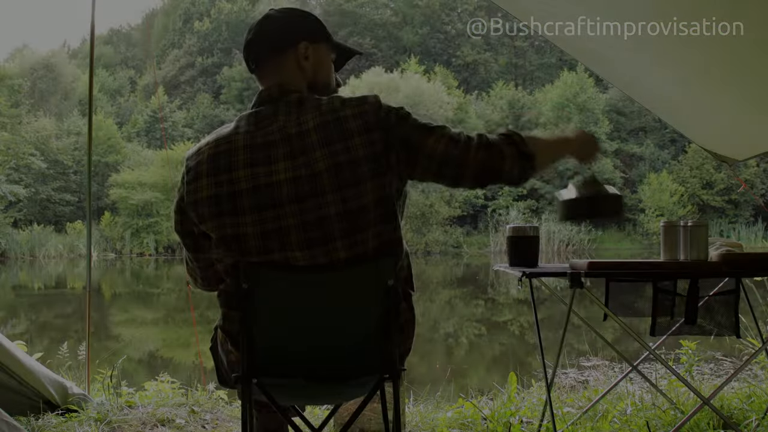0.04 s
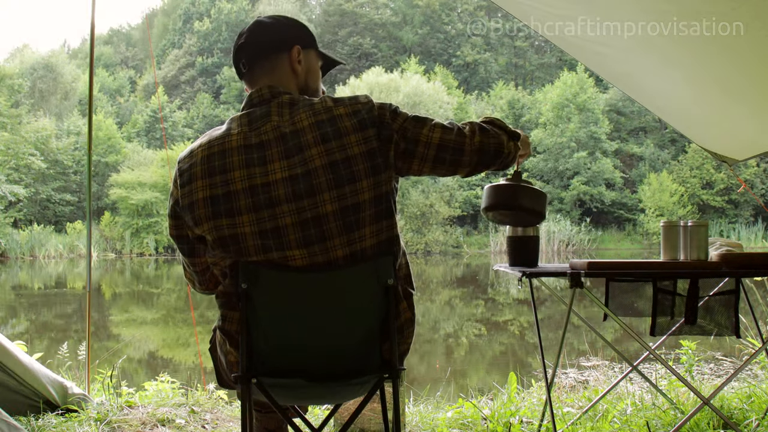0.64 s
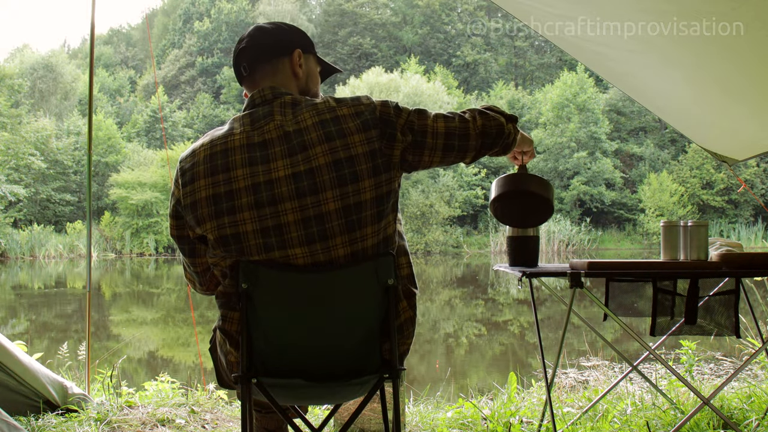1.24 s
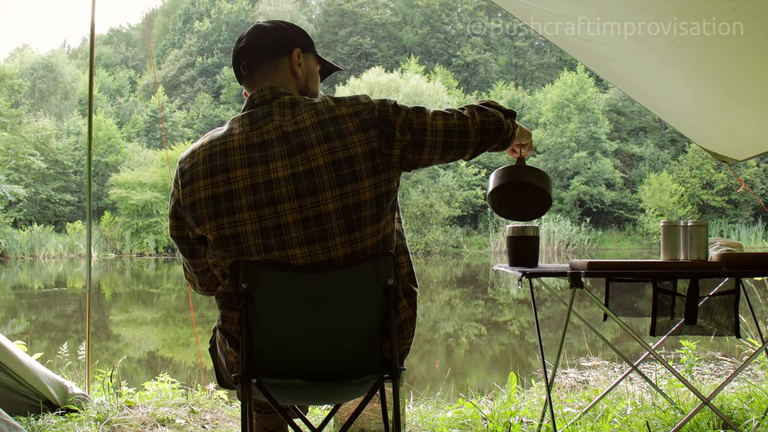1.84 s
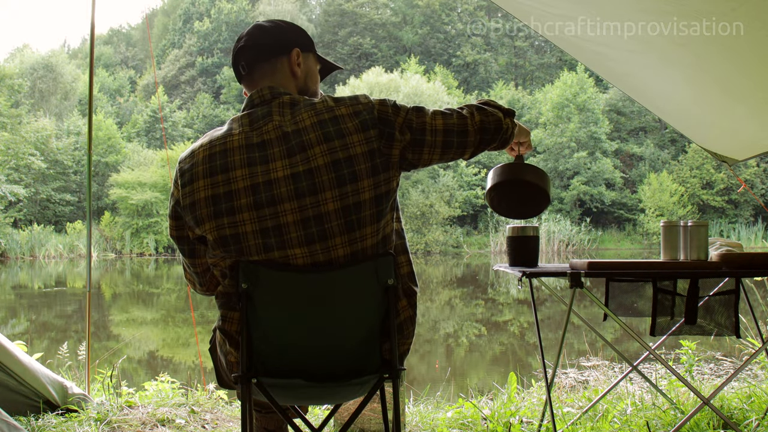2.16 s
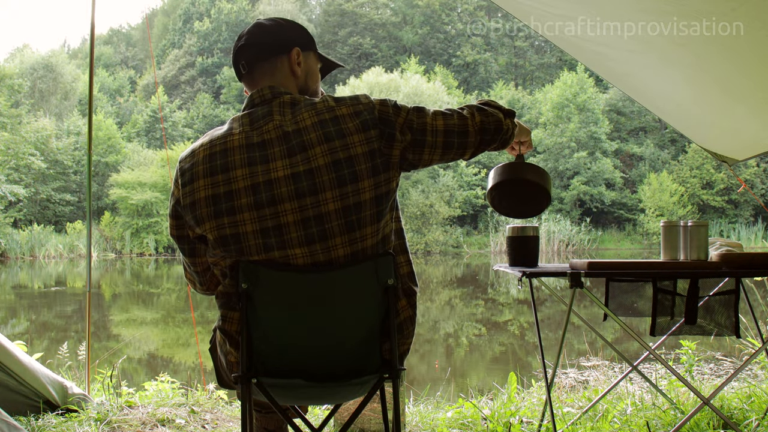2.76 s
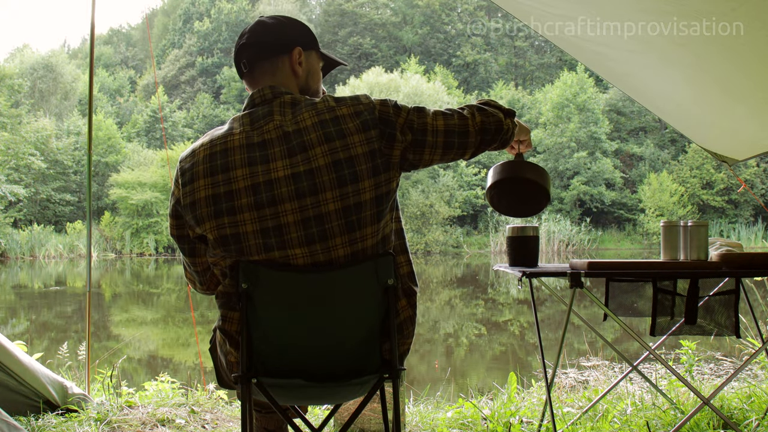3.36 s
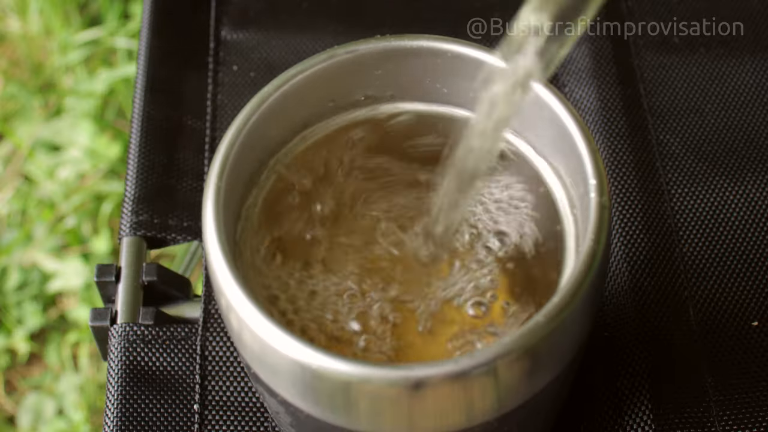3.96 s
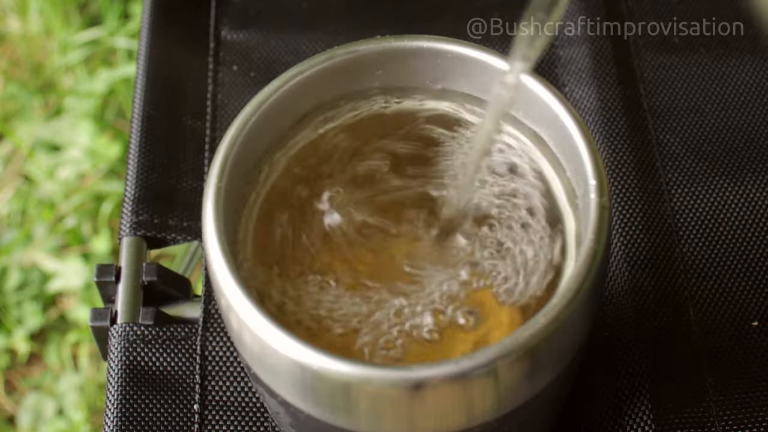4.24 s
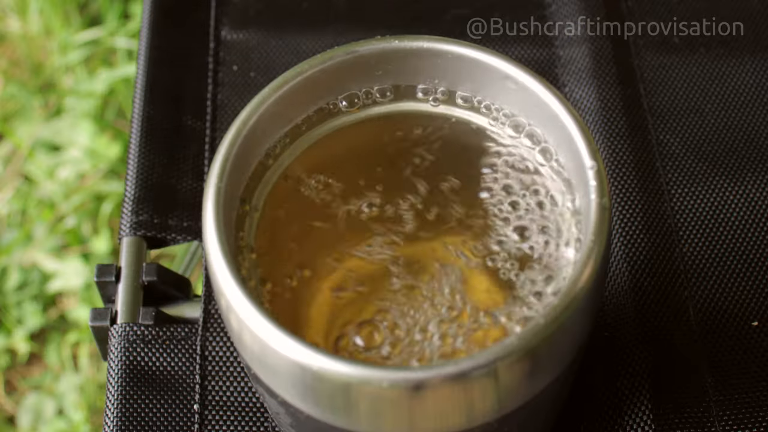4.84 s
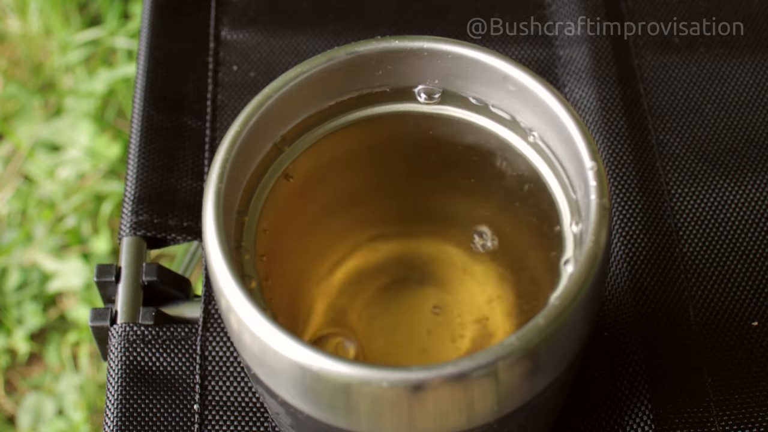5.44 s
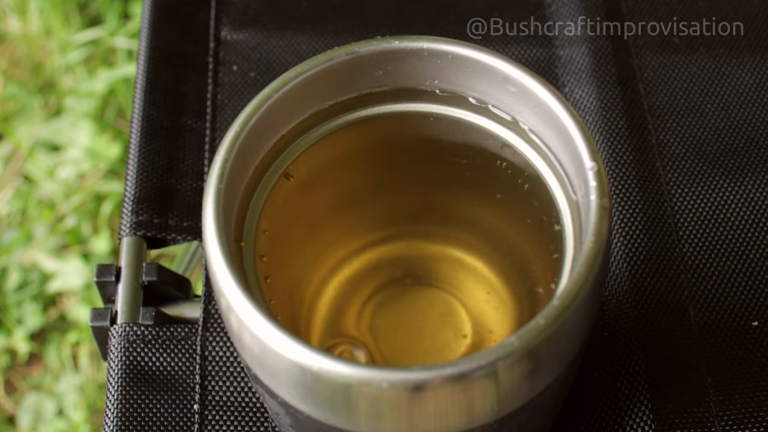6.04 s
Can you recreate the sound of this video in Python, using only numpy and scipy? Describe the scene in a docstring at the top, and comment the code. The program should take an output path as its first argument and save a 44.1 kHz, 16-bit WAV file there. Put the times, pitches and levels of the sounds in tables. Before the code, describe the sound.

Tea trickles from a kettle into a steel mug outdoors, first a few steps away, then close and splashy, ending in fizzing foam.

```python
"""Tea poured by a pond

A kettle fills a steel mug on a camp table, the microphone first a few steps off, then close to the mug.
The stream traps bubbles that ring and rise in pitch, drops splat, and the mug's low tone climbs as it
fills. When the pour stops, the table takes a few knocks and the foam fizzes out. Behind it all,
insects and thin, distant bird whistles sound over the outdoor air."""
import sys
import numpy as np
from scipy import signal
from scipy.io import wavfile

SR = 44100
rng = np.random.default_rng(int(sys.argv[2]) if len(sys.argv) > 2 else 0)


def put_to_file(sound):
    """Save the sound as 16-bit audio at rate SR, in the file named by the first command-line argument."""
    columns = np.atleast_2d(sound).T  # one column per channel
    safe = np.clip(columns, -1, 1)
    whole_steps = np.round(safe * 32767)
    wavfile.write(sys.argv[1], SR, whole_steps.astype(np.int16))


N = 268524
TIME = np.arange(N) / SR

# open air by the pond: (frequency [Hz], relative level [dB])
AIR_SPECTRUM = [(24, -57), (40, -20.5), (171, 1.5), (382, -0.5), (1090, -6.5), (2910, -12.5), (12100, -19),
                (16000, -27.5)]
# birds far off: (start [s], length [s], relative level [dB], first pitch [Hz], last pitch [Hz])
BIRD_WHISTLES = [(0.214, 0.99, -79.5, 7120, 6450), (0.7, 0.9, -80, 5080, 5060),
                 (2.4, 1.1, -83.5, 6950, 6630), (4.792, 0.47, -77, 6850, 6830),
                 (5.803, 0.18, -71, 2930, 5340)]
# insects around the pond: (time [s], level [dB], pitch [Hz])
INSECT_RASPS = [(0.458, -63.5, 11400), (1.044, -57.5, 12600), (1.419, -65, 11300), (1.513, -58.5, 14100),
                (1.757, -54.5, 12100), (2.374, -53.5, 12500), (2.759, -57.5, 11200), (3.441, -56, 13000)]
# the kettle's wire handle shifts: (time [s], relative level [dB])
HANDLE_CLICKS = [(0.256, -58), (0.598, -62)]
# knocks and soft bumps on the table: (time [s], relative level [dB], contact time [ms])
TABLE_KNOCKS = [(4.56, -44.5, 1.14), (4.613, -42, 0.12), (4.934, -45.5, 1.54), (4.973, -48.5, 0.91),
                (5.071, -49.5, 0.91), (5.196, -42, 2.8)]
# the camp table: (frequency [Hz], relative level [dB], t60 before contact damping [s])
TABLE_MODES = [(216.5, -5, 0.22), (460, 6.5, 0.032), (798, -7.5, 0.061), (1347, -7, 0.14),
               (2280, 20.5, 0.0032), (3780, 9, 0.053)]
# foam at close range: (frequency [Hz], gain [dB])
FOAM_SPECTRUM = [(1500, -9), (4000, -4), (5500, -5), (6700, -2), (8000, -3.5), (16000, -4)]
# wall and air of the half-empty mug: (frequency [Hz], width [Hz], relative level [dB])
WALL_MODES = [(1530, 1300, 9), (2470, 490, 11.5), (3486, 180, 18), (4050, 160, 19), (6100, 2200, -4.5)]
# the steel's two tones under the stream: (start [s], frequency [Hz], width [Hz], relative level [dB])
STEEL_TONES = [(1.8, 3455, 110, -62.5), (1.15, 4070, 340, -68.5)]
# the first bubbles, a few steps off: (time [s], relative level [dB], pitch [Hz])
FAR_PLINKS = [(1.523, -43, 4070), (1.536, -43.5, 3420), (1.5504, -45, 7070), (1.5636, -38.5, 2426),
              (1.8487, -38, 3500), (1.9501, -31.5, 1573), (1.974, -43.5, 6370)]
# round plops, a few steps off: (time [s], relative level [dB], gulp pitch [Hz])
FAR_PLOPS = [(1.976, -39.5, 980), (2.104, -37.5, 1070), (2.394, -36, 910), (2.437, -40, 1130),
             (2.445, -29.5, 920), (2.478, -38.5, 1100), (2.498, -36, 905), (2.526, -36, 682),
             (2.586, -45, 880), (2.623, -42, 900), (2.66, -37.5, 950), (2.673, -37, 723),
             (2.712, -35, 1106), (2.728, -42, 860), (2.762, -38, 790), (2.801, -39.5, 702),
             (3.001, -43, 1080), (3.108, -37.5, 720), (3.324, -43, 704)]
# drops on the steel wall, a few steps off: (time [s], relative level [dB])
WALL_DROPS = [(1.7028, -51.5), (1.9508, -38), (2.0287, -35), (2.219, -42.5), (2.248, -40.5), (2.398, -33.5),
              (2.436, -36), (2.475, -41.5), (2.5863, -35.5), (2.6664, -32.5), (3.326, -51), (3.3682, -38)]
# the largest bubbles, close: (time [s], relative level [dB], pitch [Hz], climb [octaves])
CLOSE_BUBBLES = [(3.649, -20, 3270, 0.18), (3.6725, -20, 1380, 0), (3.679, -24, 3060, 0.67),
                 (3.700, -18.5, 1860, 0.013), (3.7247, -20, 1800, 0), (3.7709, -22, 1670, 0.23),
                 (3.8154, -17.5, 1760, 0.78), (3.879, -26.5, 3500, 0.22), (3.9497, -15.5, 3480, 0),
                 (3.959, -22, 1800, 0.48), (3.9796, -26.5, 1850, 0.49), (4.017, -25, 1700, 0.42),
                 (4.034, -27, 2700, 0.61), (4.059, -21, 3000, 0.23), (4.1032, -22, 2640, 0.91),
                 (4.1186, -22.5, 2120, 1.0), (4.138, -25.5, 1810, 0.34), (4.1706, -19.5, 3720, 0.15),
                 (4.2536, -15.5, 1950, 0), (4.271, -23, 1640, 0), (4.302, -21, 3380, 0.66),
                 (4.3897, -20.5, 2890, 1.1), (4.4111, -22, 3100, 0.39), (4.455, -16, 3000, 0.27),
                 (4.4697, -22.5, 3320, 0.17), (4.4885, -12.5, 3580, 0.087)]
# drops slapping the tea, close: (time [s], relative crack level [dB], relative air push level [dB])
CLOSE_SPLATS = [(3.6476, -7.5, -27.5), (3.671, -24, -32), (3.7717, -33, -41), (3.796, -30, -57),
                (3.8176, -44, -34), (3.889, -24, -33.5), (3.9125, -10, -34.5), (3.9527, -20, -44),
                (4.0769, -36, -39), (4.1474, -12, -37), (4.153, -10.5, -59), (4.2003, -27, -38),
                (4.2415, -18, -34.5), (4.255, -19.5, -36), (4.36, -19, -42), (4.4132, -9.5, -33),
                (4.431, -22, -34.5), (4.4552, -22.5, -34.5), (4.487, -15, -38.5)]
# the crack of a splat: (frequency [Hz], gain [dB])
CRACK_SPECTRUM = [(300, -27), (1500, 5), (3500, 6), (6000, -1), (9000, 4.5), (15000, 0)]
# the air above the tea, close: (frequency [Hz], width [Hz], relative level [dB])
HOLLOW_MODES = [(757, 36, 5), (1030, 81, 9.5), (1200, 160, 4.5)]

# the pour starts, is heard close, thins as the kettle tips back, ends
POUR_S, CLOSE_S, TAPER_S, STOP_S = 1.45, 3.645, 4.28, 4.5
MUG_AIR_HZ = 949  # air resonance of the half-empty mug


def amp(db):
    """Decibels to gain."""
    return 10 ** (np.asarray(db) / 20)


def unit_rms(x):
    """Scales to rms 1."""
    return x / np.sqrt(np.mean(x ** 2) + 1e-20)


def since(s, t):
    """Seconds gone by since s; zero before it."""
    return np.maximum(t - s, 0)


def close_up():
    """0 while the microphone is a few steps off, 1 once it is close to the mug."""
    return np.clip((TIME - CLOSE_S) / .01 + 1, 0, 1)


def add(mix, s, sound):
    """Mixes a sound in at s seconds."""
    part = mix[max(round(s * SR), 0):][:len(sound)]
    part += sound[:len(part)]


def colour(x, spectrum):
    """Minimum-phase filter with the given spectrum."""
    hz, db = np.transpose(spectrum)
    bins_hz = abs(np.fft.fftfreq(4096, 1 / SR)) + 1
    log_gain = np.log(amp(np.interp(np.log(bins_hz), np.log(hz), db)))
    taps = np.fft.ifft(np.exp(np.conj(signal.hilbert(log_gain)))).real
    return signal.oaconvolve(x, taps[:len(taps) // 2])[:len(x)]


def resonate(x, hz, width_hz, stages=2):
    """Resonances of gain 1 in series, each width_hz wide; hz may be a pitch curve."""
    carrier = np.exp(2j * np.pi * np.cumsum(hz * np.ones(len(x))) / SR)
    pole = np.exp(-np.pi * width_hz / SR)
    for _ in range(stages):
        x = 2 * (carrier * signal.lfilter([1 - pole], [1, -pole], x / carrier + 1e-18)).real
    return x


def ring(x, modes):
    """Passes x through a set of modes whose joint response has unit energy."""
    t = np.arange(SR // 10) / SR
    response = sum(amp(db) * width * np.exp(-np.pi * width * t) * np.cos(2 * np.pi * hz * t)
                   for hz, width, db in modes)
    return signal.oaconvolve(x, response / np.linalg.norm(response))[:len(x)]


def reflections(x, t60, wet_db):
    """Adds the scattered echoes that reach the microphone after the direct sound."""
    t = np.arange(SR) / SR
    taps = rng.choice([-1, 1], len(t)) * (rng.random(len(t)) < 3000 / SR)
    taps = taps * (t > .001) * amp(-60 * t / t60)
    return x + amp(wet_db) * signal.oaconvolve(x, taps / np.linalg.norm(taps))[:N]


def burst(decay_s):
    """A dying puff of noise, of unit energy."""
    t = np.arange(SR // 25) / SR
    puff = rng.standard_normal(len(t)) * np.exp(-t / decay_s)
    return puff / np.linalg.norm(puff)


def patter(per_s, spread_db):
    """Random clicks of uneven size, rms 1."""
    size = amp(spread_db * np.minimum(rng.exponential(1, N), 4)) * rng.choice([-1, 1], N)
    return unit_rms(size * (rng.random(N) < per_s / SR))


def spurts(per_s, depth_db):
    """A gain that wanders at random, as when a falling stream breaks up."""
    knots = rng.standard_normal(N // 100)
    wander = np.interp(TIME * per_s, np.arange(len(knots)), knots)
    return amp(depth_db * np.clip(wander, -2, 2))


def bubble(hz, t60, rise, swell_cycles):
    """A trapped bubble rings up, then sharpens as it nears the surface."""
    t = np.arange(int(t60 * SR * 1.2)) / SR
    envelope = (1 - np.exp(-t * hz / swell_cycles)) * amp(-60 * t / t60)
    return envelope * np.sin(2 * np.pi * hz * t * (1 + rise * t / t60 / 2))


def chirp(hz, octaves, length_s):
    """A bubble that swells and fades, climbing by `octaves` through hz."""
    progress = np.arange(0, length_s, 1 / SR) / length_s
    pitch = hz * 2 ** (octaves * (progress - 1 / 3))
    return np.sin(np.pi * progress ** .47) ** 2 * np.sin(2 * np.pi * np.cumsum(pitch) / SR)


def bubble_cluster(centre_hz):
    """One drop traps six tiny bubbles within a few ms; unit energy."""
    out = np.zeros(SR // 25)
    for k, (tune, wait) in enumerate(rng.uniform(-0.8, 1, (6, 2))):
        plink = bubble(centre_hz * 2 ** (0.5 * tune), t60=0.011, rise=0.042, swell_cycles=0.55)
        add(out, k * 0.00078 * (1 + wait / 2), plink / np.sqrt(k + 1))
    return out / np.linalg.norm(out)


def swarm(start, end, pitch, octaves, cycles, rise, spread_db, count):
    """Many small bubbles scattered about a pitch (Hz, or a function of time); rms 1 while they last."""
    out = np.zeros(N)
    times = start + (end - start) * (np.arange(count) + rng.uniform(-0.965, 1, count)) / count
    for s, (tune, size, life) in zip(times, np.clip(rng.standard_normal((count, 3)), -2, 2)):
        hz = (pitch(s) if callable(pitch) else pitch) * 2 ** (octaves * tune)
        t60 = cycles / hz * np.exp(0.44 * life)
        gain = amp(spread_db * size) * np.sqrt(hz)  # small bubbles are brief but sharp
        add(out, s, gain * bubble(hz, t60, rise, swell_cycles=0.53))
    return unit_rms(out) * np.sqrt((end - start) * SR / N)


def pond_air():
    """An even outdoor wash over a low rumble that swells once and is weaker close to the mug."""
    wash, low = rng.standard_normal((2, N))
    rumble = unit_rms(resonate(low, hz=97, width_hz=124))
    swell = amp(-60) * np.exp(-((TIME - 2.665) / 0.051) ** 2)
    rumble_gain = amp(-70.5 - 9.5 * close_up()) + swell
    return amp(-65) * unit_rms(colour(wash, AIR_SPECTRUM)) + rumble_gain * rumble


def birds():
    """Gliding whistles far from the microphone, blurred by the trees."""
    out = np.zeros(N)
    for s, length, db, first_hz, last_hz in BIRD_WHISTLES:
        blur = rng.standard_normal(2 * SR)[:int(length * SR)]
        hz = first_hz + (last_hz - first_hz) * np.sin(np.linspace(0, np.pi / 2, len(blur)))
        whistle = unit_rms(resonate(blur, hz, width_hz=240))
        add(out, s, amp(db + 3) * whistle * signal.windows.tukey(len(blur), .6))
    return reflections(out, t60=0.6, wet_db=0)


def insects():
    """Each rasp is a few wing strokes, their teeth exciting a high resonance; the trees echo it."""
    out = np.zeros(N)
    for s, db, hz in INSECT_RASPS:
        teeth = rng.standard_normal(SR // 4)[:int(.11 * SR)]
        strokes = 1 + 0.64 * np.cos(2 * np.pi * (48 * TIME[:len(teeth)] + rng.random()))
        wing = unit_rms(resonate(teeth * abs(teeth) * strokes, hz, width_hz=3000))
        add(out, s - len(wing) / SR / 2, amp(db) * wing * np.hanning(len(wing)))
    return reflections(out, t60=0.43, wet_db=-10)


def kettle_handle():
    """Small dry clicks of the handle on the kettle's lugs."""
    out = np.zeros(N)
    for s, db in HANDLE_CLICKS:
        add(out, s, amp(db + 27.5) * burst(decay_s=0.0038))
    return ring(out, modes=[(1080, 790, 0), (2760, 250, 0)])


def table_knocks():
    """A soft, long contact moves only the table's low modes and damps them; a hard one rings them all."""
    out, t = np.zeros(N), np.arange(SR // 3) / SR
    for s, db, contact_ms in TABLE_KNOCKS:
        contact_s = contact_ms / 1000
        damping = 1 + 0.39 * contact_ms
        modes = sum(amp(level - 60 * damping * t / t60) * np.sin(2 * np.pi * hz * t)
                    / (1 + (hz * contact_s) ** 2) for hz, level, t60 in TABLE_MODES)
        attack = 1 - np.exp(-t / (2 * contact_s))
        add(out, s, amp(db) * modes * attack)
    return reflections(out, t60=0.12, wet_db=-4.5)


def foam():
    """Close up, tiny bubbles burst, the larger first; as the foam thins the ticks grow fewer and softer."""
    hold_s, growth_db_per_s = 0.14, 12
    gathered = amp(-53 - growth_db_per_s * since(TIME, STOP_S))  # builds until the stream stops
    collapse = amp(-21.5 * since(STOP_S + hold_s, TIME) ** 2)
    left = close_up() * (collapse + amp(-32.5)) + 1e-6  # a few bubbles linger
    pitch = lambda s: 6740 * 2 ** (0.82 * since(STOP_S, s))
    pops = swarm(CLOSE_S, N / SR, pitch, octaves=0.42, cycles=6, rise=0.22, spread_db=5.5, count=1900)
    ticks = patter(per_s=3000 * left, spread_db=3) * np.sqrt(left.mean() / left)
    fizz = colour(1.16 * pops + ticks, FOAM_SPECTRUM)
    return fizz * spurts(per_s=240, depth_db=3.5) * left * gathered


def first_gush():
    """The stream covers the bottom: a wet splatter whose bubbles quickly grow and fall in pitch."""
    start_s, end_s, fall_octaves_per_s = 1.845, 1.96, 8.1
    pitch = lambda s: 4400 * 2 ** (-fall_octaves_per_s * since(start_s, s))
    return amp(-60) * swarm(start_s, end_s, pitch, octaves=0.3, cycles=50, rise=0.06, spread_db=3, count=90)


def singing_steel():
    """The stream drums up two steady tones in the steel, heard from a few steps off."""
    build_s = 1.64
    drumming = patter(per_s=100, spread_db=3) * (1 - close_up())
    return sum(amp(db) * unit_rms(resonate(drumming, hz, width)) * np.minimum(since(s, TIME) / build_s, 1)
               for s, hz, width, db in STEEL_TONES)


def trickle():
    """The thin, uneven stream between the plops: gurgle, spatter on the wall, mist and singing steel."""
    build_s, shallow_until_s, deep_s = 0.59, 2.61, 2.91
    flow = amp(-28 * np.clip(1 - since(POUR_S, TIME) / build_s, 0, 1))
    gurgle = swarm(POUR_S, CLOSE_S, 850, octaves=0.37, cycles=12, rise=0.12, spread_db=2, count=560)
    gurgle = unit_rms(gurgle + resonate(gurgle, MUG_AIR_HZ, width_hz=110, stages=1))
    gurgle *= amp(-60 - 12.5 * since(TIME, deep_s))  # deeper tea gurgles more
    spatter = swarm(POUR_S, CLOSE_S, 3400, octaves=0.45, cycles=24, rise=0.2, spread_db=5.5, count=600)
    spatter = ring(amp(-69.5) * spatter, WALL_MODES)
    mist = swarm(POUR_S, CLOSE_S, 7800, octaves=0.5, cycles=17, rise=0.05, spread_db=4.5, count=700)
    mist *= amp(-68.5 - 25 * since(shallow_until_s, TIME))  # fine droplets fly off shallow tea
    unevenness = spurts(per_s=70, depth_db=4)
    return unevenness * (flow * (gurgle + mist + spatter) + singing_steel())


def plops():
    """A few bubbles plink first; then each plop is a gulp that rings the mug's air."""
    out = np.zeros(N)
    for s, db, hz in FAR_PLINKS:
        add(out, s, amp(db - 7.5) * bubble(hz, t60=0.044, rise=0.037, swell_cycles=0.36))
    for (s, db, gulp_hz), tune in zip(FAR_PLOPS, rng.uniform(-1.7, 1, len(FAR_PLOPS))):
        air_hz = MUG_AIR_HZ * 2 ** (0.043 * tune)
        add(out, s, amp(db + 7.5) * bubble(air_hz, t60=0.032, rise=0.02, swell_cycles=2.14))
        add(out, s, amp(db - 4) * chirp(gulp_hz, octaves=0.04, length_s=0.011))
    return out


def wall_drops():
    """Each drop rings the steel wall; the spot it strikes favours some of the modes."""
    out = np.zeros(N)
    soften = signal.butter(2, 9800, fs=SR, output="sos")  # a wet blow has little treble
    spots_db = 7 * rng.uniform(-1.8, 1, (len(WALL_DROPS), len(WALL_MODES)))
    for (s, db), spot_db in zip(WALL_DROPS, spots_db):
        modes = [(hz, width, level + bias) for (hz, width, level), bias in zip(WALL_MODES, spot_db)]
        blow = burst(decay_s=0.0064) + 0.66 * bubble_cluster(centre_hz=3215)
        strike = signal.sosfilt(soften, ring(blow, modes))
        add(out, s, amp(db + 16) * strike / np.linalg.norm(strike))
    return out


def far_pour():
    """The half-empty mug from a few steps off, with short reflections."""
    return reflections(plops() + wall_drops() + first_gush() + trickle(), t60=0.067, wet_db=-8.5)


def filling_tone(pushes, flow):
    """Splats and churn stir the mug's low tone, which climbs as it fills."""
    start_hz, climb_hz_per_s = 334, 47
    stirring = amp(16) * pushes + amp(6) * flow * rng.standard_normal(N)
    return resonate(stirring, start_hz + climb_hz_per_s * since(CLOSE_S, TIME), width_hz=84)


def close_pour():
    """Microphone at the mug: bubbles chirp over a churn; each splat cracks and pushes the mug's air."""
    bubbles, cracks, pushes = np.zeros((3, N))
    for s, db, hz, climb in CLOSE_BUBBLES:
        length_s = 0.0037 + 0.0063 * abs(climb)  # a bubble that climbs further sounds longer
        add(bubbles, s, amp(db - 5.5) * chirp(hz, climb, length_s))
        add(bubbles, s, amp(db + 2) * bubble_cluster(centre_hz=3110))
        add(cracks, s, amp(db - 4.5) * burst(decay_s=0.0028))  # the surface ticks as it closes
    for s, crack_db, push_db in CLOSE_SPLATS:
        add(pushes, s, amp(push_db + 19) * np.ones(1))
        add(cracks, s + 0.00099, amp(crack_db + 4.5) * burst(decay_s=0.00051))
    # the stream holds, thins, then breaks off; its bubbles get smaller, faster as it thins
    flow = close_up() * amp(-44 - 42 * since(TAPER_S, TIME) - 379 * since(STOP_S, TIME))
    pitch = lambda s: 2115 * 2 ** (0.21 * since(CLOSE_S, s) + 0.74 * since(TAPER_S, s))
    churn = swarm(CLOSE_S, STOP_S, pitch, octaves=0.56, cycles=17, rise=0.4, spread_db=2.5, count=560)
    spray = swarm(CLOSE_S, STOP_S, 8500, octaves=0.42, cycles=22, rise=0.2, spread_db=5.5, count=330)
    pushes += amp(-19) * flow * patter(per_s=180, spread_db=2.5)
    mug = ring(pushes, HOLLOW_MODES) + filling_tone(pushes, flow)
    stream = flow * spurts(per_s=60, depth_db=3.5) * (churn + amp(-10.5) * spray)
    return reflections(bubbles + stream + colour(cracks, CRACK_SPECTRUM) + mug, t60=0.022, wet_db=-9)


def scene():
    """The camp table and the pond around it, at one microphone."""
    wildlife = insects() + birds()
    camp = far_pour() + close_pour() + foam() + table_knocks() + kettle_handle()
    return (camp + wildlife + pond_air())[None]


def record(dry):
    """The microphone's bass roll-off and the recorder's band limit."""
    bass_cut = signal.butter(2, 60, "highpass", fs=SR, output="sos")
    band_limit = signal.firwin(255, 16300, window=("kaiser", 8), fs=SR)
    return signal.oaconvolve(signal.sosfilt(bass_cut, dry), band_limit[None], "same")


dry = scene()
out = record(dry)
put_to_file(out)
```